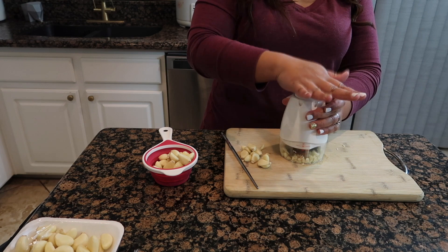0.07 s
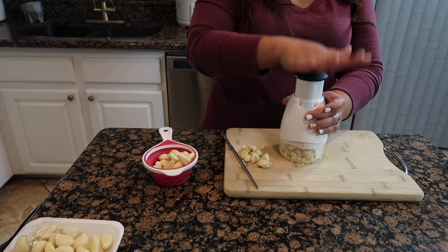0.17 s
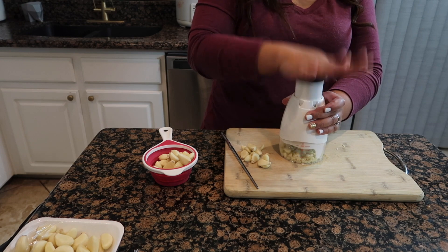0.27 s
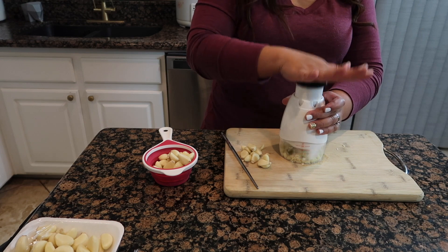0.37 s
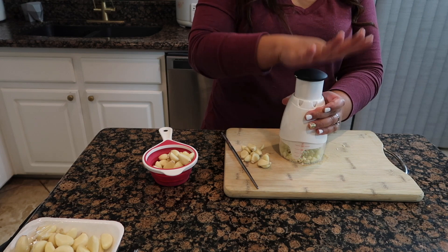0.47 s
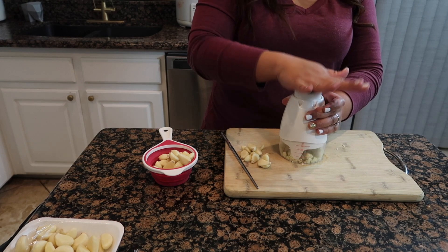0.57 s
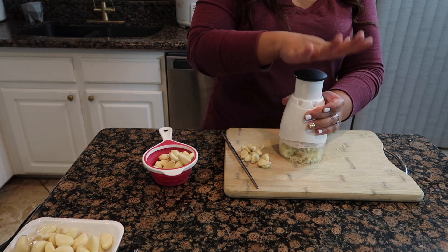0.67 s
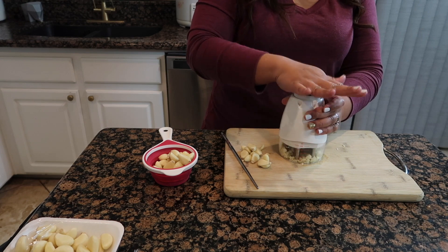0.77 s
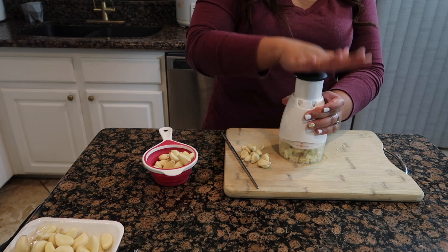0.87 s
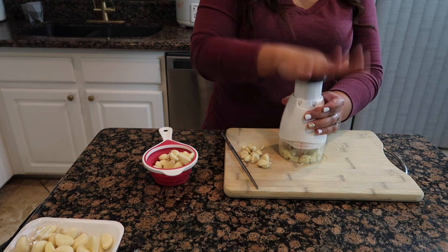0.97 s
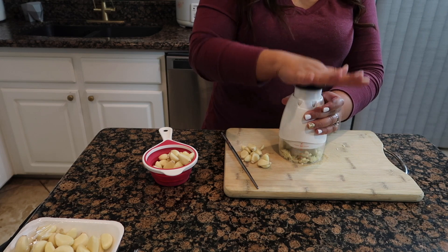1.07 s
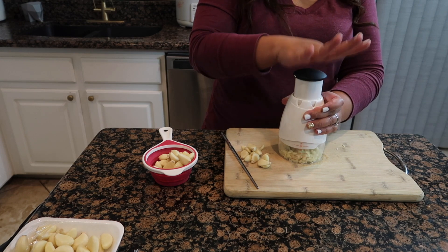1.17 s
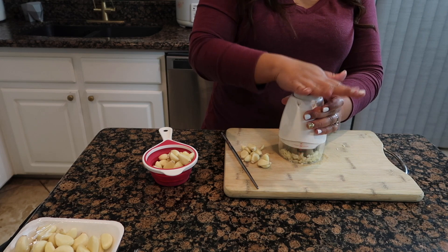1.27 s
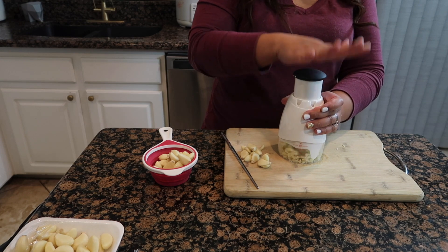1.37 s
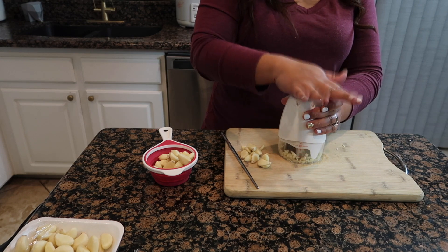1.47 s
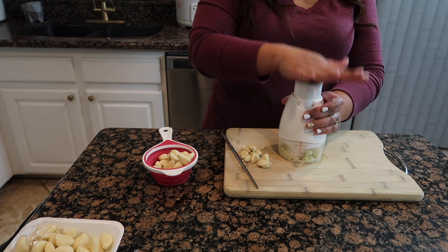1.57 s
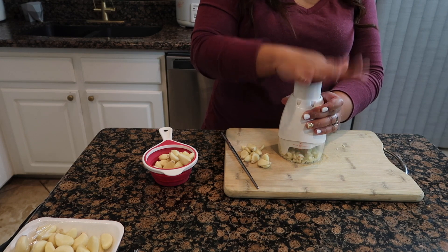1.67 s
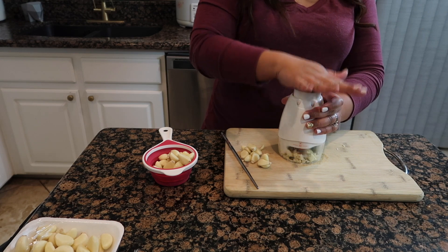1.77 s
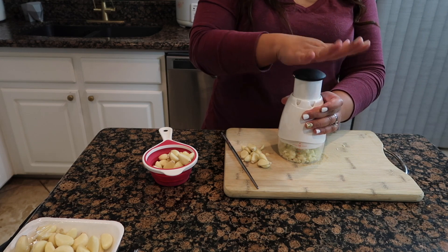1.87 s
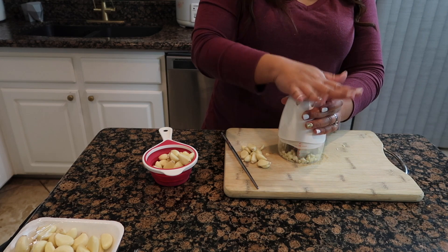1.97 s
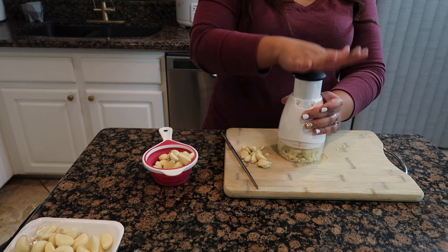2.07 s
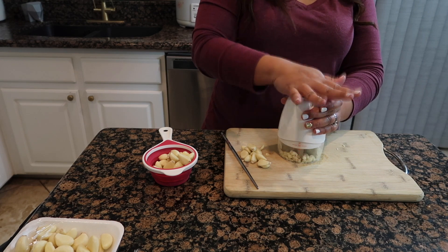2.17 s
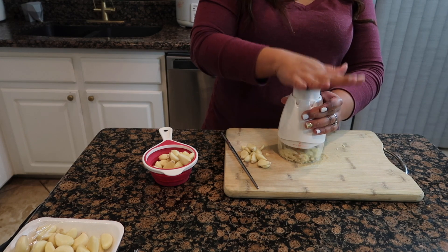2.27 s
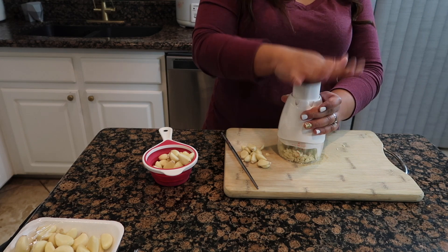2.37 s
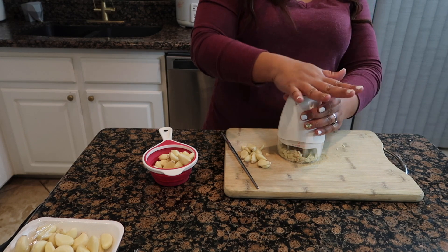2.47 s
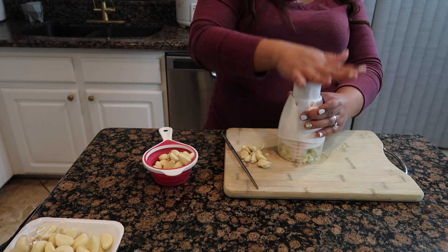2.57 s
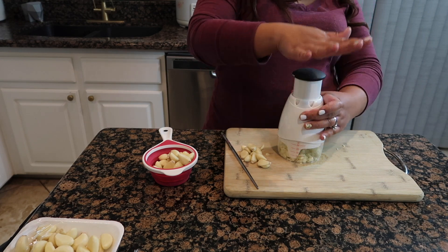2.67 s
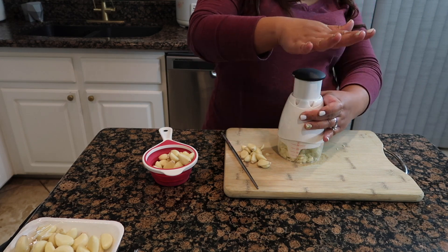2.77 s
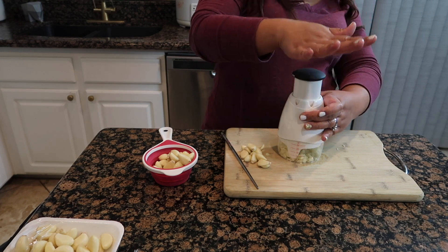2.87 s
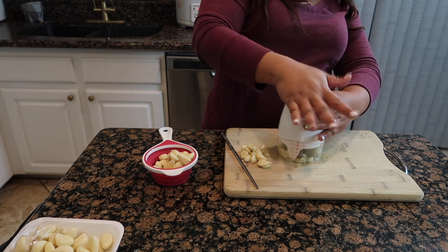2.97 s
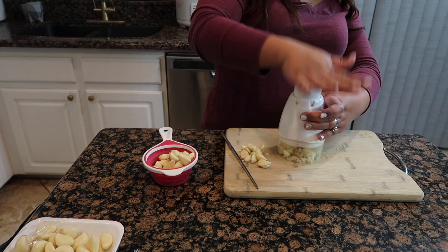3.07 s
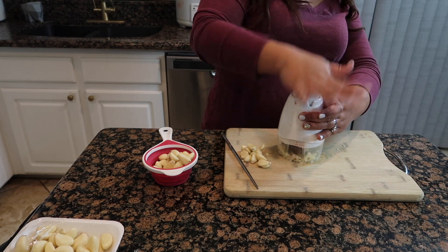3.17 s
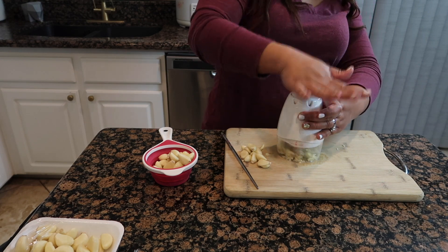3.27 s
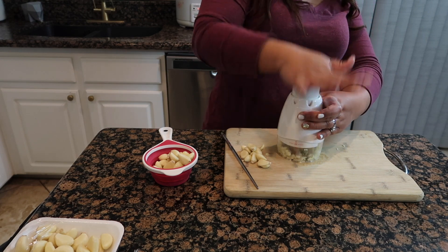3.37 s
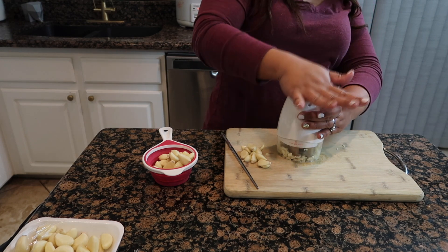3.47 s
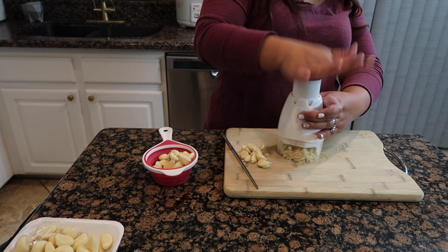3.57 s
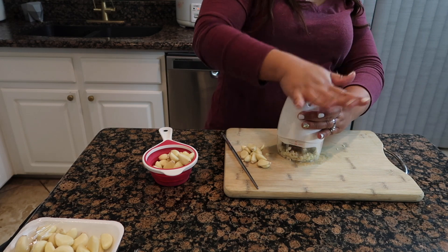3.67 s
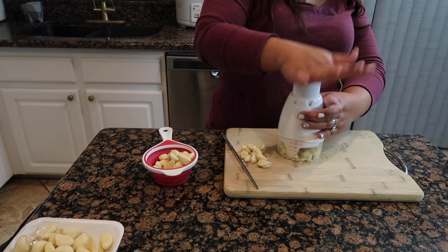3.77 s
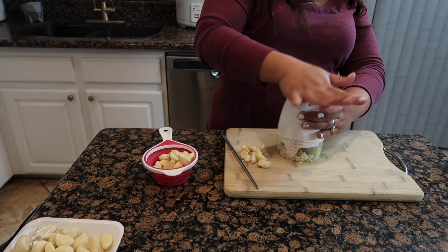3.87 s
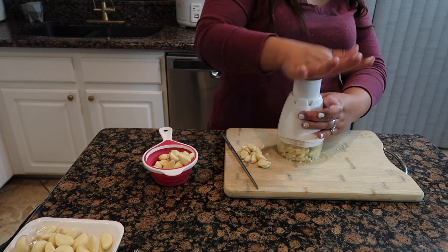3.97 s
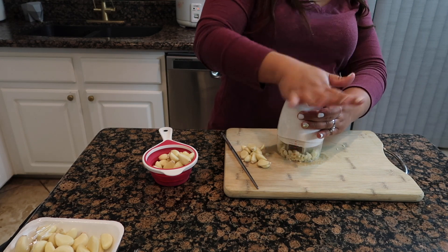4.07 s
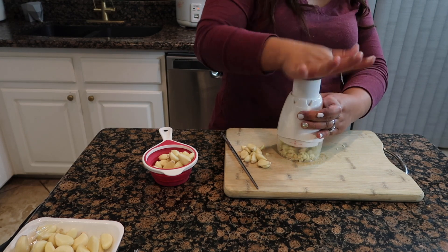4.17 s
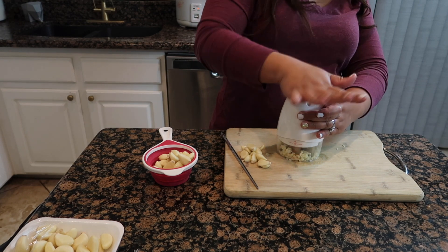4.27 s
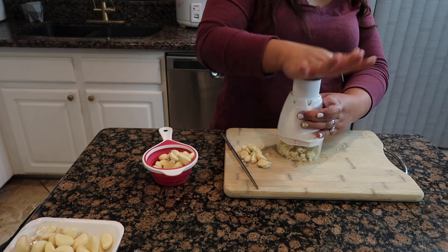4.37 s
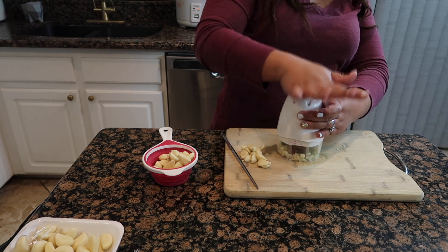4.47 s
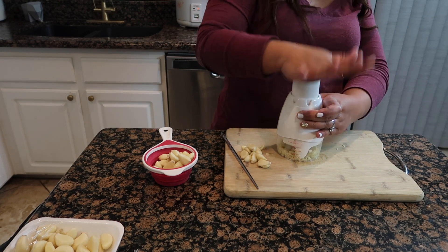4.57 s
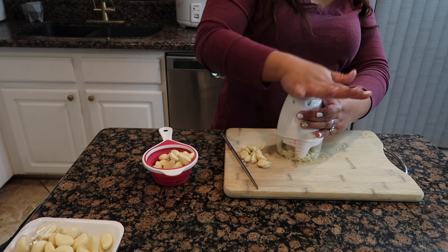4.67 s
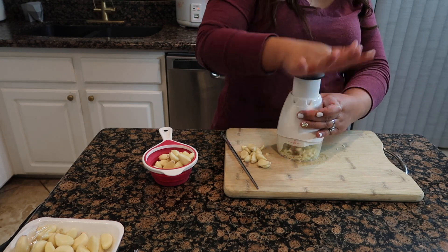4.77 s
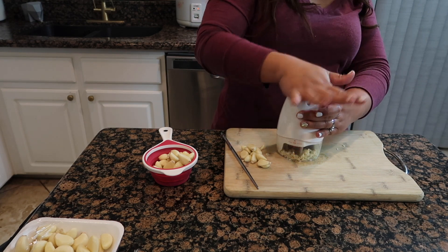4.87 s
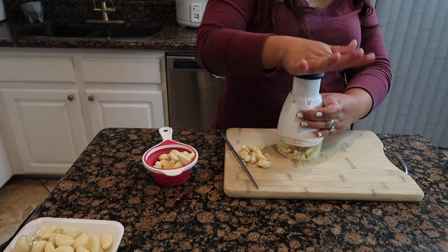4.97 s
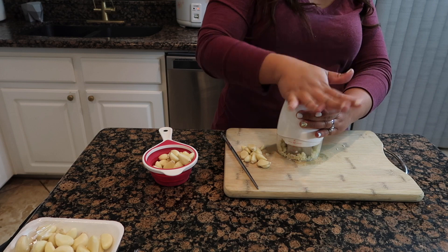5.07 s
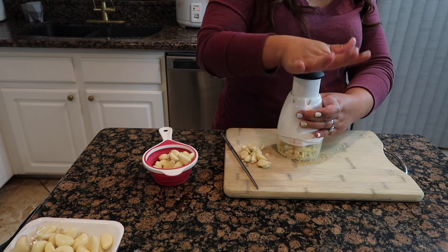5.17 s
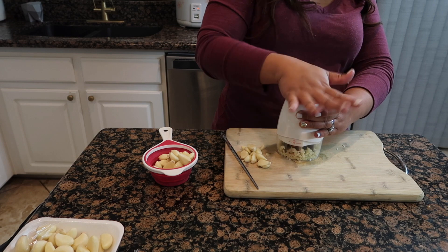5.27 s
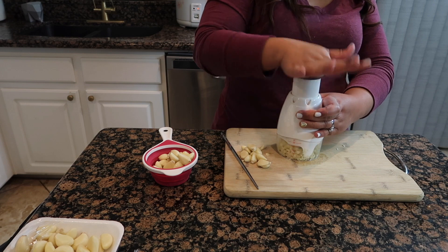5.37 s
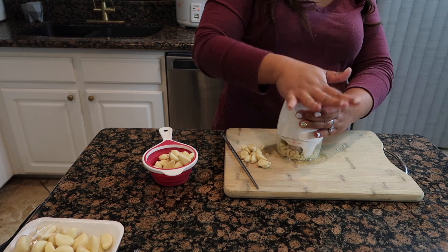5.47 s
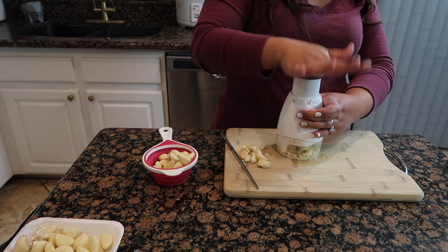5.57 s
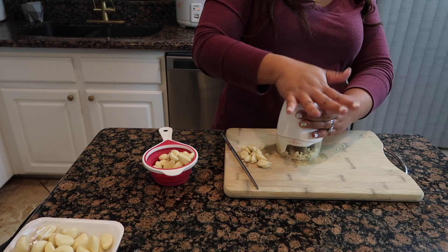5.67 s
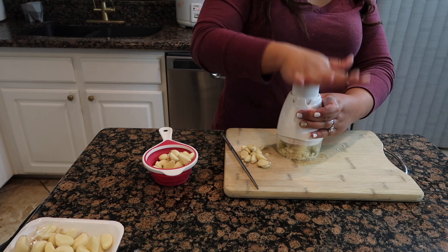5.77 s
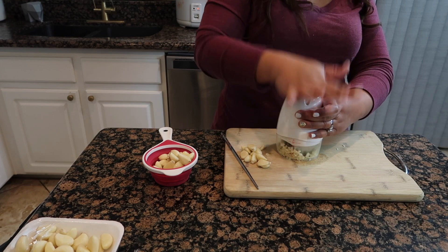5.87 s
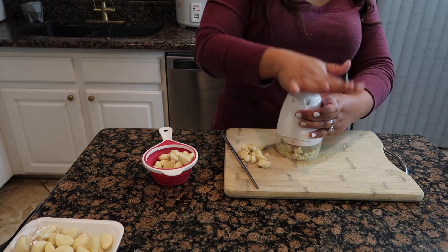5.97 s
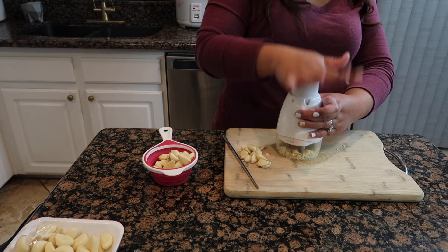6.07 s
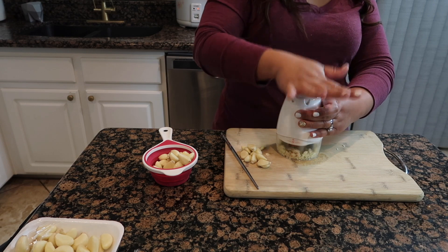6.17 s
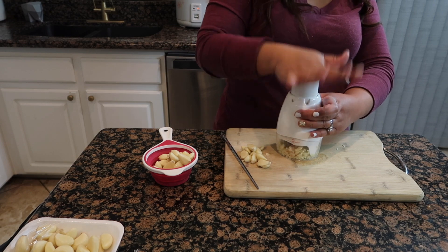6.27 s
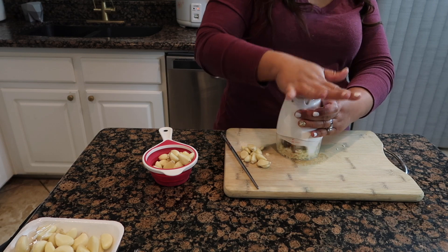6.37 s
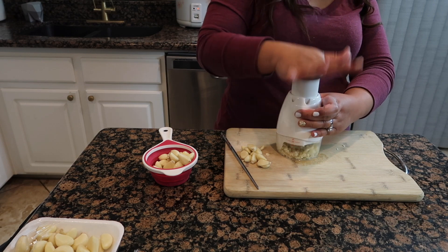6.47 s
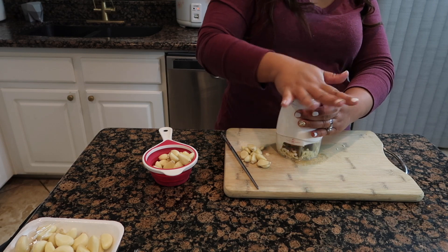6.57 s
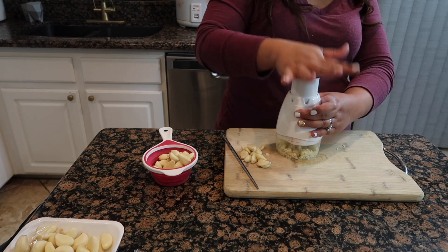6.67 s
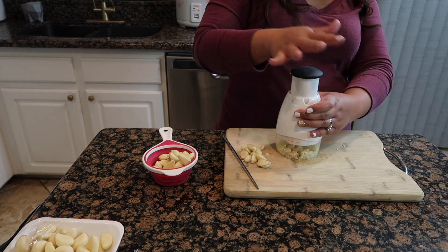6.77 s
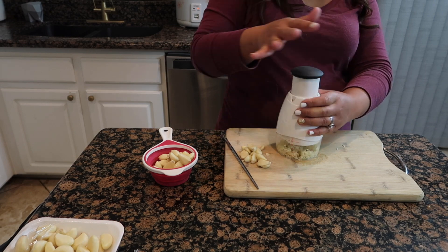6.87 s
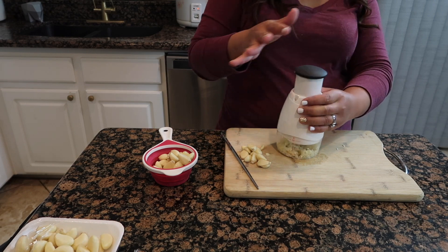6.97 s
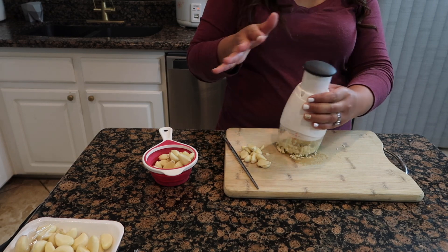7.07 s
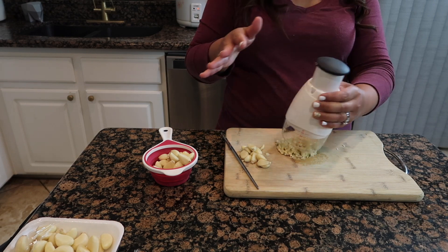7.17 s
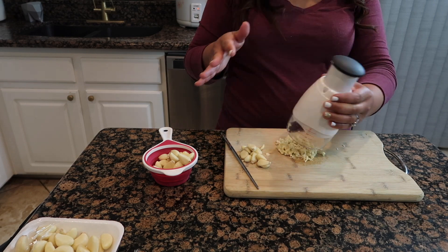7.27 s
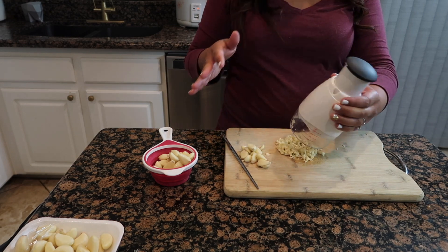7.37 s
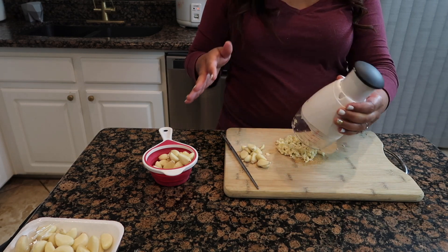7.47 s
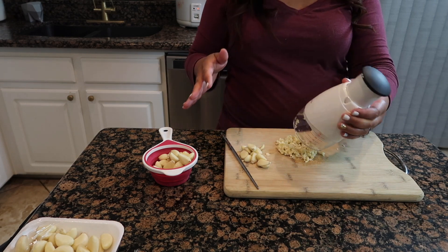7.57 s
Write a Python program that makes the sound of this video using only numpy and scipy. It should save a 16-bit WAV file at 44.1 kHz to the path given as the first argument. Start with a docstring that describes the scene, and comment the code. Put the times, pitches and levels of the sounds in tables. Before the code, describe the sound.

A small, quiet kitchen with a faint low hush and short, bright reflections, heard from fairly close in stereo, the chopper just right of centre. From 0 to about 2.7 seconds a plastic plunger chopper is driven onto a wooden board roughly every 0.23 seconds. Each stroke is a soft palm slap, a garlic crunch with a hard double clack and tiny bounce, then a light spring rattle about a tenth of a second later. A brief gap follows, with a cluster of knocks at 3.0. From 3.2 to 6.8 a second bout runs slightly faster, fuller and thumpier, with shorter, duller rattles, louder sleeve scraping and irregular knocks between strokes; a couple of hits near 4.5 are weaker. Chopping stops after 6.8. Two soft, dull rim taps come at 7.2 and 7.3, leaving quiet room tone until about 7.6.

```python
"""Garlic under a plunger chopper

A plunger chopper minces garlic on a wooden board in a kitchen, in a lighter and a harder bout.
Each stroke is a palm slap, a crunch with a quick double blow and a bounce, then a spring rattle.
These are bursts of noise made of tiny contacts, shaped by filters for the housing on its board.
The plunger rubs in its sleeve, knocks fall between the strokes, and at the end the rim taps twice.
The room answers with short echoes over a quiet, low hush."""
import sys
import numpy as np
from scipy import signal
from scipy.fft import rfft, irfft, next_fast_len
from scipy.io import wavfile

SR = 44100
rng = np.random.default_rng(int(sys.argv[2]) if len(sys.argv) > 2 else 0)


def log_audio(samples):
    """Write samples as a 16-bit WAV file to the path given in sys.argv[1]."""
    # one column per channel
    frames = np.atleast_2d(samples).T
    # limit to full scale, then quantise
    limited = np.clip(frames, -1, 1)
    pcm = np.round(limited * 32767).astype(np.int16)
    wavfile.write(sys.argv[1], SR, pcm)


N = 336042
SIZE = 16384  # samples in one short sound or filter
FREQS = np.fft.rfftfreq(SIZE, 1 / SR) + 1  # Hz; the 1 keeps logarithms finite
AGE = np.arange(SIZE) / SR  # s since a short sound began
TIME = np.arange(N) / SR  # s since the scene began


def undb(db):
    """Turn decibels into a gain."""
    return 10 ** (np.asarray(db) / 20)


def unit(x):
    """Scale a sound so that its squares add up to one."""
    return x / np.sqrt(np.sum(x ** 2))


def along(points, hz):
    """Read a curve of (f, value) points on a log-frequency axis."""
    f, value = np.transpose(points)
    return np.interp(np.log(hz), np.log(f), value)


def causal(db):
    """Spectrum of the quickest response with this gain curve (minimum phase, by way of the cepstrum)."""
    cepstrum = irfft(db * np.log(10) / 20)
    cepstrum[1:SIZE // 2] *= 2
    cepstrum[SIZE // 2 + 1:] = 0
    return np.exp(rfft(cepstrum))


def even(x, size, widen=0):
    """Spectrum of x with its broad humps levelled, so that only its fine pattern remains."""
    spectrum = rfft(x, SIZE)
    bins = np.arange(len(FREQS))
    reach = (size + widen * bins).astype(int)
    low = np.maximum(bins - reach, 0)
    high = np.minimum(bins + reach, bins[-1])
    power = np.cumsum(abs(spectrum) ** 2)
    nearby_power = (power[high] - power[low]) / (high - low)
    return spectrum * causal(-10 * np.log10(nearby_power + 1e-12))


def through(x, response):
    """Pass a sound through an impulse response."""
    return signal.fftconvolve(x, response)[:N]


def tint(x, points):
    """Filter a sound by a gain curve of (f/Hz, gain/dB) points."""
    return through(x, irfft(causal(along(points, FREQS))))


def add(track, s, sound):
    """Mix a sound into the track at a time in seconds."""
    start = max(int(s * SR), 0)
    track[start:start + len(sound)] += sound[:N - start]


# colour of the room tone, before its level is set: f/Hz, level/dB
AIR = [(25, -11.5), (45, -8.5), (75, 9.5), (130, 2.5), (280, 3.5), (700, -10), (2400, -20.5), (6000, -28.5),
       (12000, -42), (15000, -53)]
# how loud the room tone is over time: t/s, level/dB
AIR_LEVEL = [(2.9, -54), (7.1, -56.5), (7.62, -52)]


def room_tone():
    """A quiet low hush of the house: noise with a fixed colour and a slowly changing level."""
    hz = np.fft.rfftfreq(N, 1 / SR) + 1
    hush = irfft(rfft(rng.standard_normal(N)) * undb(along(AIR, hz)), N)
    level_db = np.interp(TIME, *np.transpose(AIR_LEVEL))
    return unit(hush) * np.sqrt(N) * undb(level_db)


# time the kitchen's tail takes to fall by 60 dB: f/Hz, t/s
ROOM_T60 = [(70, 0.52), (200, 0.15), (500, 0.23), (1100, 0.4), (3000, 0.38), (7000, 0.35), (14000, 0.17)]
# colour of all reflected sound: f/Hz, level/dB
WET = [(80, -2), (300, -5), (1000, 2), (3000, -2.5), (7000, 8), (14000, 1)]


def echoes(early_db, late_db, early_s=0.012, build_s=0.0033):
    """Quick reflections from counter and cupboards, then a diffuse tail; each band fades at its own pace."""
    centres = np.geomspace(60, 15000, num=9)  # Hz
    noise, tail = rfft(rng.standard_normal(SIZE)), 0
    for k, hz in enumerate(centres):
        band = np.interp(np.log(FREQS), np.log(centres), np.arange(len(centres)) == k)
        fade = np.exp(-np.log(1000) * AGE / along(ROOM_T60, hz))
        tail = tail + irfft(noise * band) * fade
    tail = even(tail * (1 - np.exp(-AGE / build_s)), size=20)
    # the first reflections wait 2 ms
    early = even(rng.standard_normal(SIZE) * (AGE > .002) * np.exp(-AGE / early_s), size=60)
    return irfft((undb(early_db) * early + undb(late_db) * tail) * causal(along(WET, FREQS)))


def kitchen(sound, direct, early_db, late_db):
    """The moving arm and the swaying body keep shifting the sound's paths: four echo patterns trade places."""
    arm = 2 * np.pi * 1.1 * TIME  # 1.1 Hz
    body = 2 * np.pi * .37 * TIME  # 0.37 Hz
    shares = [a * b for a in (np.cos(arm), np.sin(arm)) for b in (np.cos(body), np.sin(body))]
    reflected = sum(through(sound * share, echoes(early_db, late_db)) for share in shares)
    return direct * sound + reflected


# broad colour of housing and board, before scaling: f/Hz, level/dB
SHELL = [(30, -41), (50, -29.5), (100, -8), (230, -14), (500, -6.5), (1000, -2), (2100, 2), (3500, -7),
         (5000, -16.5), (7000, -26), (9000, -35), (12500, -35.5), (15000, -44.5)]
# their resonances: f/Hz, width/Hz (a floor widens narrow ones), level/dB above the broad colour
MODES = [(73.4, 31, 13.5), (137, 25, 7), (154.8, 20.7, 8), (312, 36, 8), (406.5, 64, 11.5), (522, 39, 7.5),
         (603, 38, 7), (657, 75, 4), (821, 150, 5.5), (930, 26, 5.5), (1060, 81, 2.5), (1170, 34, 1.5),
         (1177, 40, 2.5), (1454, 45, 3.5), (1507, 20, 4.5), (1650, 34, 3.5), (1776, 32, -1),
         (1855, 45, 1.5), (1990, 59, 4), (2350, 75, 1), (3570, 110, 3), (4220, 320, 1.5), (4680, 43, -3)]


def housing():
    """Response of the plastic housing standing on the board, with unit gain in the clack band."""
    damping = .036  # least width of a resonance, as a share of its frequency
    db = along(SHELL, FREQS)
    for hz, width, peak_db in MODES:
        # the plastic damps every resonance, so none rings long
        db = db + peak_db / (1 + (2 * (FREQS - hz) / max(width, damping * hz)) ** 2)
    response = causal(db)
    clack = (FREQS > 700) & (FREQS < 3000)
    return irfft(response) / np.sqrt(np.sum(irfft(response * clack) ** 2))


def clatter(spread_db, grain_s, count=14):
    """A stream of tiny contacts; each wakes only some bands, so every band sparks on its own."""
    centres = np.geomspace(300, 15000, num=count)  # Hz
    size = next_fast_len(N)
    noise, hz = rfft(rng.standard_normal(size)), np.fft.rfftfreq(size, 1 / SR)
    out = 0
    for k in range(count):
        band = irfft(noise * np.interp(hz, centres, np.arange(count) == k), size)[:N]
        # mostly small contacts, now and then a big one, but never without limit
        sizes = undb(spread_db * np.minimum(rng.exponential(size=SIZE), 4))
        sparks = np.interp(TIME / grain_s, np.arange(SIZE), sizes)
        out = out + band * unit(sparks)
    return unit(out) * np.sqrt(N)


def stretch(stream):
    """Pick a random short stretch of a stream, so that no two contacts are alike."""
    start = rng.integers(N - SIZE)
    return stream[start:start + SIZE]


# centres of thump, body, clack, bite, treble and sizzle: f/Hz
ZONES_HZ = [170, 450, 1200, 2800, 5600, 11000]


def weigh(force, db, thump_db, body_db, bite_db, treble_db, sizzle_db):
    """Give a contact its strength and hardness, by level and by colour relative to the clack zone."""
    zones_db = [thump_db, body_db, 0, bite_db, treble_db, sizzle_db]
    colour = np.interp(np.log(FREQS), np.log(ZONES_HZ), zones_db)
    # the level counts as an average over 30 ms
    pattern = even(force, size=30, widen=.25) * np.sqrt(.03 * SR)
    return irfft(pattern * causal(colour + db))


# share of a contact's extra weight that reaches down into the thump
THUMP_SHARE = 0.66


def weighted(colour, weight_db):
    """The more weight bears on the board, the more body and thump a contact has."""
    return np.add(colour, [THUMP_SHARE * weight_db, weight_db, 0, 0, 0])


# two bouts, the second pressed harder: sleeve rubbing starts t/s, rubbing begins to fade t/s,
#   sleeve rubbing level/dB, spring rattle decay t/s, build-up of the crunch t/s
BOUTS = [(0, 2.4, -38, 0.028, 0.016), (3.035, 6.74, -31, 0.017, 0.0033)]


def bout_at(s):
    """Index of the bout that a moment belongs to."""
    return int(s > BOUTS[1][0])


# colour of the plunger rubbing in its sleeve: f/Hz, level/dB
SLEEVE = [(100, 2), (450, -1), (1200, 0.5), (2300, 0), (5600, -3.5), (11000, -0.5)]


def rubbing(stream, jerk_db=2.0, rest_db=-9, rest_after_s=0.13, rest_s=0.041, release_s=.02):
    """The plunger scrapes along its sleeve in random jerks and goes quieter at the top of each stroke."""
    steps = np.arange(0, TIME[-1], .008)  # a new jerk every 8 ms
    jerks = np.interp(TIME, steps, rng.standard_normal(len(steps)))
    rest = sum(np.exp(-((steps - row[0] - rest_after_s) / rest_s) ** 2) for row in STROKES)
    pressure = 0
    for start, fade_from, db, *_ in BOUTS:
        release = np.exp(-np.maximum(TIME - fade_from, 0) / release_s)
        pressure = pressure + undb(db) * (TIME >= start) * release
    scrape = unit(tint(stream, SLEEVE) * undb(jerk_db * jerks)) * np.sqrt(N)
    return scrape * pressure * undb(rest_db * np.interp(TIME, steps, rest))


def rattles(table, stream, rise_s, gain_db):
    """Each jolt sets off a clatter: a burst of tiny contacts swells quickly and dies away."""
    track = np.zeros(N)
    for s, db, *colour, rattle_s in table:
        force = stretch(stream) * (1 - np.exp(-AGE / rise_s)) * np.exp(-AGE / max(rattle_s, .002))
        add(track, s - .001, weigh(force, db + gain_db, *colour))
    return track


# the chopper taps the board as it is tipped away: t/s, level/dB before the rattle gain
LIFTS = [(7.228, -60.5), (7.339, -55)]
# colour of those taps: thump, body, bite, treble, sizzle, each level/dB
LIFT_COLOUR = (-1, 0, 0, -16, -16)
LIFT_RATTLE_S = 0.0053  # their decay time


def lifts():
    """The rim taps softly, with little treble, as the chopper leaves the board."""
    return [(s, db, *LIFT_COLOUR, LIFT_RATTLE_S) for s, db in LIFTS]


# knocks between the strokes; the first, at 3.025, is the palm pressing the blades into fresh cloves:
#   t/s, level/dB before the rattle gain, extra weight level/dB, decay t/s
KNOCKS = [(3.025, -31.5, 2.5, 0.0068), (3.035, -22.5, -3.5, 0.028), (3.062, -25.5, 7.5, 0.0047),
          (3.306, -36, -4, .0036), (3.679, -26, 0, 0.017), (3.809, -38, -9, .007), (3.905, -25, 0, 0.0074),
          (4.408, -32, -13, 0.0068), (4.607, -30.5, 0.5, 0.011), (5.327, -42, 13, 0.014),
          (5.958, -34, 2, 0.0044), (6.505, -33, 5, 0.0071)]
# colour of a knock without extra weight: thump, body, bite, treble, sizzle, each level/dB
KNOCK_COLOUR = (7.5, 1, 4, 8, 7.5)


def knocks():
    """Short knocks between the strokes, each with its own weight and decay."""
    return [(s, db, *weighted(KNOCK_COLOUR, weight_db), rattle_s) for s, db, weight_db, rattle_s in KNOCKS]


# colour of the spring's return, one row per bout: thump, body, bite, treble, sizzle, each level/dB
SPRING_COLOUR = [(3, 1.1, 1.3, 5.4, 7.5), (11, 4.8, 4.2, 5.2, 4.3)]


def returns():
    """The spring throws the plunger back up: a longer, lighter rattle at first, shorter and duller later."""
    events = []
    for s, *_, lag, db, weight_db in STROKES:
        bout = bout_at(s)
        events.append((s + lag, db, *weighted(SPRING_COLOUR[bout], weight_db), BOUTS[bout][3]))
    return events


# colour of the palm on the cap, one row per bout: thump, body, bite, treble, sizzle, each level/dB
PALM_COLOUR = [(6, 3.8, 2.5, -5.5, 0), (7.5, 1.9, 2.3, 1, -2)]
# a slower push rattles longer: the slap's decay time as a share of the push time
PALM_RATTLE_SHARE = 0.23


def slaps():
    """The palm lands on the cap just before the blades hit."""
    events = []
    for s, *_, push_s, db, _, _, _ in STROKES:
        events.append((s - push_s, db, *PALM_COLOUR[bout_at(s)], PALM_RATTLE_SHARE * push_s))
    return events


def blow(stream, ring_db):
    """One hard contact: a short clack plus the longer ring of the plastic walls, never twice the same."""
    clack_s, ring_s = .003, .01  # decay times
    clack = unit(stretch(stream) * np.exp(-AGE / clack_s))
    ring = unit(stretch(stream) * np.exp(-AGE / ring_s))
    return clack + undb(ring_db) * ring


# one row per stroke (levels before later gains). Blades hit the board: t/s, level/dB, extra weight level/dB,
#   second blow: later by t/s, level/dB against the first,
#   palm lands on the cap: earlier by t/s, level/dB,
#   plunger springs back: later by t/s, level/dB, extra weight level/dB
STROKES = [(0.0325, -17.5, -0.5, .005, 9, 0.033, -30.5, .101, -34, 2.5),
           (0.252, -17, -2, .005, 3.5, 0.05, -32, 0.11, -30.5, 2),
           (0.497, -17.5, 1.5, .004, 5.5, .045, -29.5, 0.1, -26, -3),
           (0.7215, -16, -0.5, .006, 4, .042, -25, 0.11, -28.5, -1),
           (0.9576, -16, -1, .005, 8.5, 0.039, -30, 0.11, -30.5, -3),
           (1.2089, -18.5, 1.5, 0.0044, 8.5, 0.043, -30.5, .096, -31.5, 2.5),
           (1.4335, -16, 0, .006, 6, 0.062, -34.5, 0.11, -28.5, -1.5),
           (1.6856, -16, -2, .004, 9, 0.077, -33.5, 0.085, -28, 1.5),
           (1.924, -17, 0, .0066, 0, 0.053, -31.5, 0.088, -29.5, -1),
           (2.1538, -17, 2.5, .006, 0.5, 0.04, -23.5, 0.084, -29, 2.5),
           (2.4073, -17, 2.5, .005, 8.5, 0.065, -42, 0.076, -32.5, 1.5),
           (2.676, -19, 8, .006, 7, 0.084, -34, .035, -32, -1),
           (3.1743, -14.5, -4.5, 0.0021, 7.5, .024, -31.5, 0.092, -32.5, -4),
           (3.4081, -18.5, -1, .007, 1.5, 0.064, -31, 0.088, -30.5, 7.5),
           (3.6297, -19, 2.5, .004, -3.5, .05, -25.5, 0.083, -28.5, -6.5),
           (3.8419, -19.5, -4, .004, -4, 0.066, -30, .082, -26, 2),
           (4.0423, -16.5, -2.5, .006, -11, .053, -28.5, 0.084, -41.5, 11),
           (4.2421, -20.5, 3, .003, 8, 0.059, -28, 0.084, -30, 4),
           (4.4495, -30, 7.5, .005, 6.5, 0.057, -28.5, 0.069, -29.5, -8),
           (4.6307, -25.5, 6.5, .005, -1, 0.055, -26, 0.069, -25, -2),
           (4.8347, -16.5, 1, .0045, 1.5, .046, -23, .097, -31.5, 0),
           (5.0513, -19.5, 2, .0056, 1.5, .065, -32.5, 0.094, -32.5, -2),
           (5.248, -19, -1, .003, 2.5, 0.05, -28.5, 0.089, -30, 7.5),
           (5.467, -22.5, -4, .004, 7, 0.079, -34, 0.067, -32.5, -4),
           (5.6671, -18, 1, .006, 0.5, .0455, -23.5, 0.089, -28, 2),
           (5.891, -17.5, 0, 0.0048, 4.5, 0.061, -25, 0.089, -28, 7),
           (6.1108, -18, -1, .007, 4.5, 0.055, -26.5, 0.087, -31, 0.5),
           (6.3246, -18.5, 3.5, .009, 0.5, 0.054, -27, .085, -26.5, -1),
           (6.5393, -17.5, -4.5, 0.0049, 4.5, .068, -30.5, 0.078, -28.5, 3.5),
           (6.7684, -21, 0, .007, 9, .06, -27.5, 0.062, -48, 5)]
# colour of the blades' blows, one row per bout: thump, body, bite, treble, sizzle, each level/dB
CHOP_COLOUR = [(-3.5, -0.1, 1, -1, -1), (2, 5, 3.5, 2.5, 1.5)]


def chops(ring_db=-8, crunch_db=-10, crunch_s=0.0039, bounce_db=-8, bounce_s=0.0057):
    """The blades crush through garlic and strike the board in a double blow, then the housing bounces."""
    track = np.zeros(N)
    lead = .008  # s of crunch before the first blow
    stream = clatter(spread_db=2, grain_s=.001)
    for s, db, weight_db, delay, second_db, *_ in STROKES:
        bout = bout_at(s)
        *_, build_s = BOUTS[bout]
        # the crunch swells up to the blow, then fades
        crush = np.exp(np.minimum((AGE - lead) / build_s, (lead - AGE) / crunch_s))
        force = undb(crunch_db) * unit(stretch(stream) * crush)
        bounce = delay + bounce_s * rng.uniform(.6, 1.4)
        for after, hit_db in ((0, 0), (delay, second_db), (bounce, bounce_db)):
            wait = int((lead + abs(after)) * SR)
            force += undb(hit_db) * np.pad(blow(stream, ring_db), (wait, 0))[:SIZE]
        add(track, s - lead, weigh(force, db, *weighted(CHOP_COLOUR[bout], weight_db)))
    return track


# gain on the side signal (half of right minus left) of the chopper: f/Hz, level/dB
WIDTH = [(60, -50), (150, -37.5), (350, -28.5), (600, -40.5), (1300, -40.5), (2400, -22), (3300, -11.5),
         (4200, -3.5), (6000, -3.5), (8500, 3), (15000, 8.5)]
# width of the room tone, side against mid: f/Hz, level/dB
AIR_WIDTH = [(60, -33.5), (250, -15.5), (1000, -3.5), (4000, 0.5), (12000, -0.5)]
# the chopper stands right of centre: scale in s of the blows' head start on the right,
# applied to the blows before the overall gain
RIGHT_LEAD_S = 0.000012


def scene():
    """All contacts sound through the housing into the room; blows lean right and the treble spreads wide."""
    loose = clatter(spread_db=5, grain_s=.003)
    force = rubbing(loose)
    force += rattles(slaps(), loose, rise_s=0.0059, gain_db=0.5)
    force += rattles(returns(), loose, rise_s=0.00088, gain_db=0.0)
    force += rattles(knocks() + lifts(), loose, rise_s=0.00098, gain_db=-2.5)
    blows = through(chops(), housing())
    sound = undb(-1.15) * (blows + through(force, housing()))
    mid = kitchen(sound, 1, early_db=-15.5, late_db=-6) + room_tone()
    side = tint(kitchen(sound, .25, early_db=-6, late_db=-7), WIDTH)
    side += tint(room_tone(), AIR_WIDTH)
    # adding a sound's slope moves it slightly earlier on the right and later on the left
    side += RIGHT_LEAD_S / 2 * SR * np.gradient(blows)
    pan_db = -0.4  # left against right
    left = undb(pan_db / 2) * (mid - side)
    right = undb(-pan_db / 2) * (mid + side)
    return np.array([left, right])


TOP_HZ = 15500  # upper edge of the sound


def record(dry):
    """Round the highest peaks with a soft curve, then cut steeply above the top frequency."""
    ceiling = 1.25
    rounded = ceiling * np.tanh(dry / ceiling)
    return signal.sosfilt(signal.ellip(10, .2, 80, TOP_HZ, fs=SR, output="sos"), rounded)


dry = scene()
out = record(dry)
log_audio(out)
```